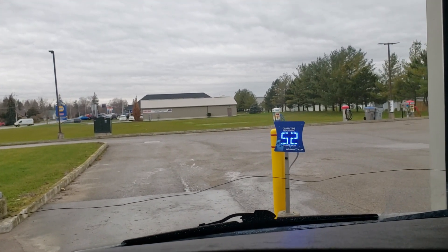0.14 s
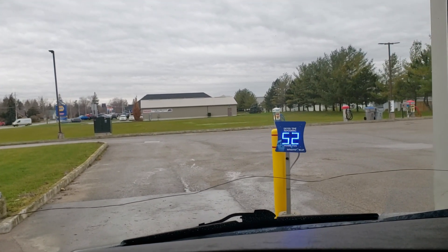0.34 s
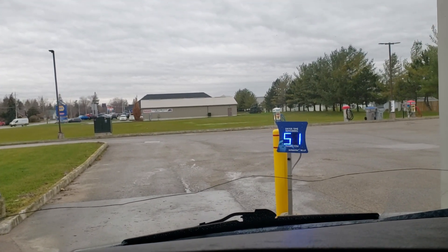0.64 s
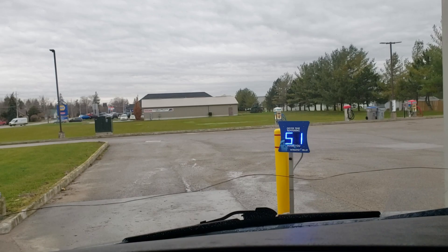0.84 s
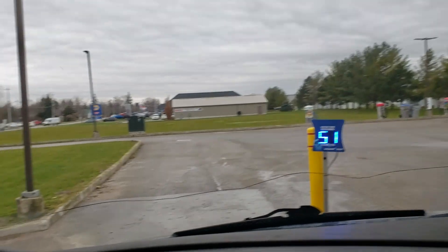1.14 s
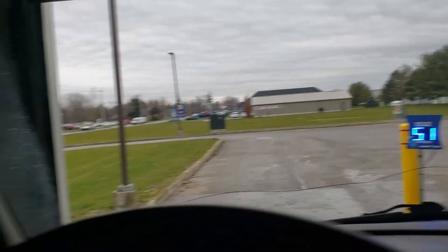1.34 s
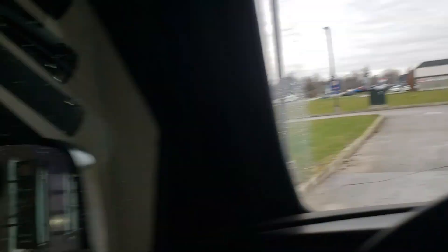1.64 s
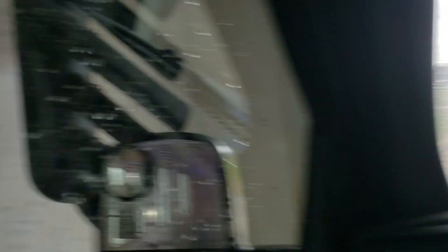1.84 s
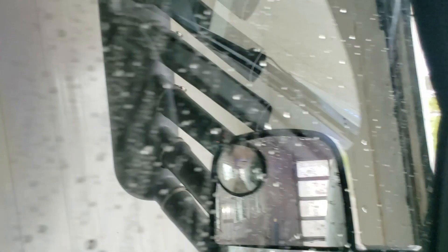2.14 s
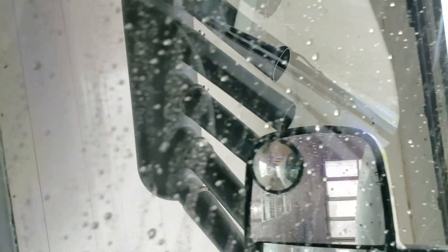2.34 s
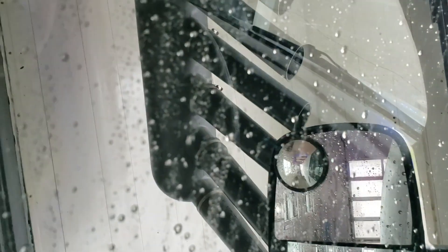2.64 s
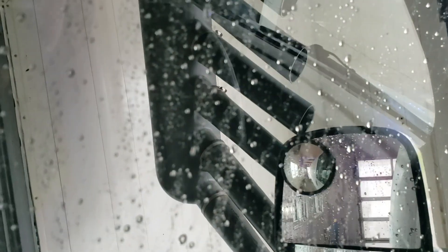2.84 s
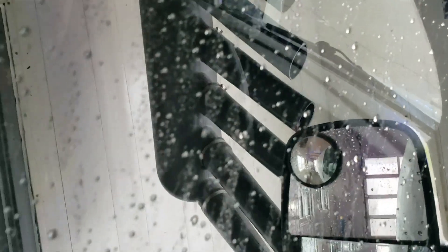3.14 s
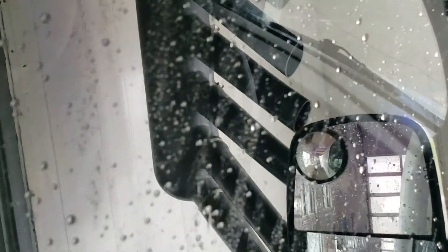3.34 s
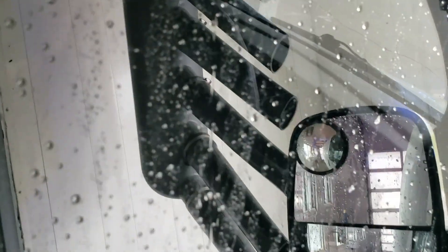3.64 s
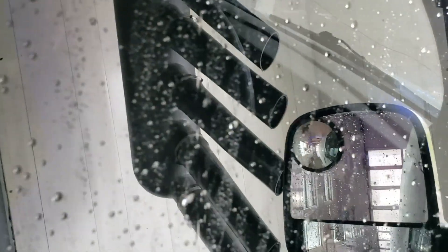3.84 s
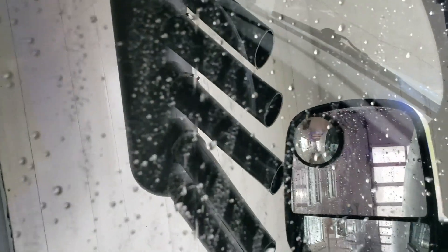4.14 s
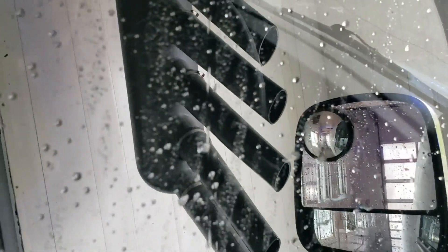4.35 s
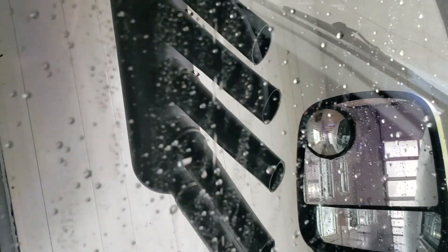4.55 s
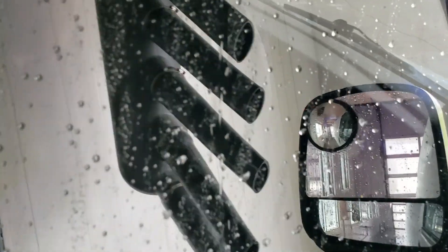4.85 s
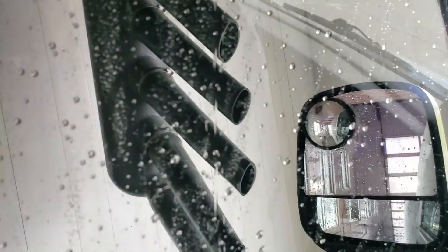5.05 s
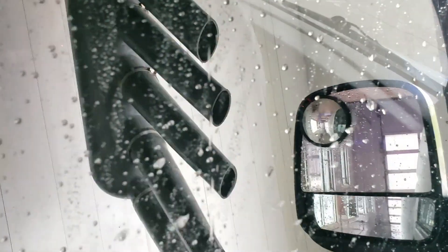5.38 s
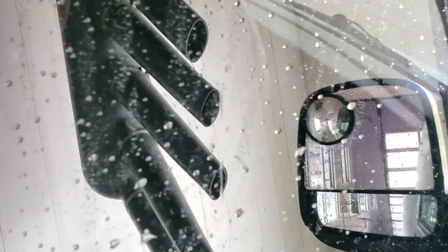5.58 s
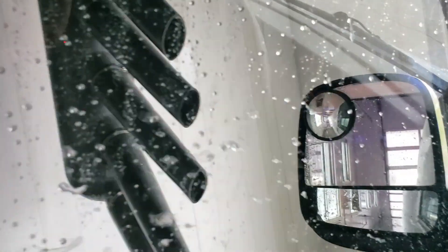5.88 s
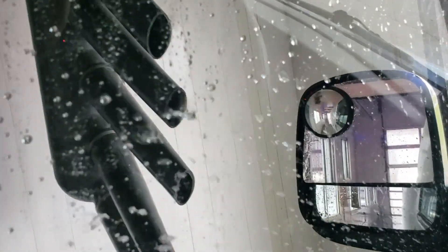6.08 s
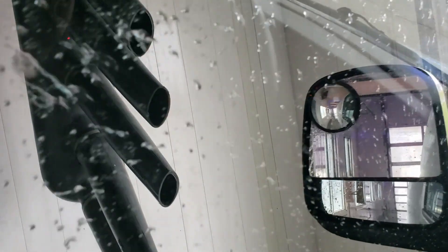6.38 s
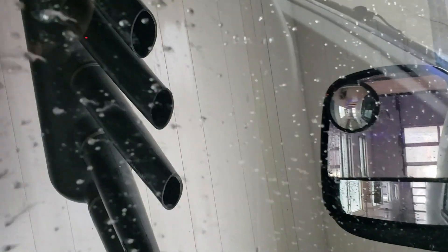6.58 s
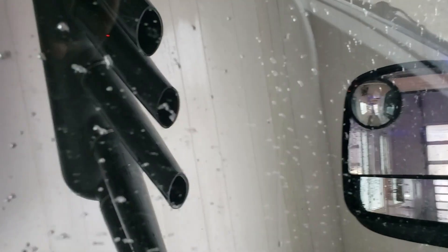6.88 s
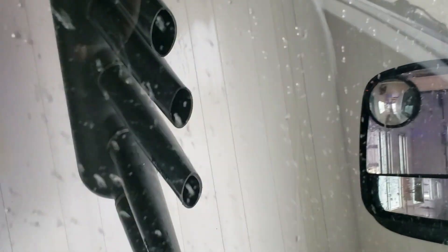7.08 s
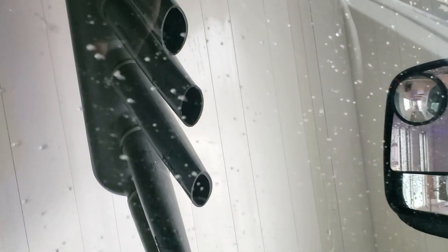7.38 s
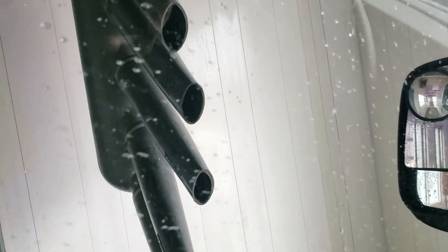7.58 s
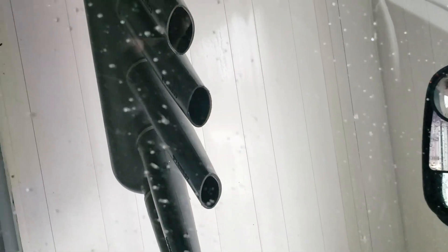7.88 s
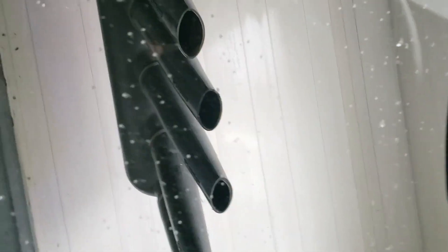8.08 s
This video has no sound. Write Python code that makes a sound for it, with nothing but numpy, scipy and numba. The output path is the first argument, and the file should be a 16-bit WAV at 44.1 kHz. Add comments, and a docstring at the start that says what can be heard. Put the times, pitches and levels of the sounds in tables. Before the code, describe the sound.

A loud, continuous dryer blast surrounds a slowly rolling vehicle, captured by a hand-held phone in the closed cab. Low drumming dominates, rising quickly in the first second, then shifting between panels as the jets pass. One faint tick comes early, followed by a wavering window hum. Muffled airy roar, thin hiss and a faint fan tone persist, while tiny wet spatters touch the glass later. The roar is still going at the end.

```python
"""A booming rush of air swells at once: car wash blowers dry a slowly rolling pickup, heard in the closed cab.
Jets drum the body panels (resonances shaken by noise) and the side window partly locks into a wavering hum.
Air over glass and seals is coloured noise; fans whine as faint sines; a tick is two filtered impulses.
Spray patters as flickering noise, splats as short ringing bursts.
A hand-held phone hears it at two ports; the second is duller, with partly its own treble."""
import sys
import numpy as np
from scipy import signal
from scipy.fft import rfft, irfft
from scipy.io import wavfile
from scipy.ndimage import uniform_filter1d
from numba import njit

SR = 44100
rng = np.random.default_rng(int(sys.argv[2]) if len(sys.argv) > 2 else 0)


def materialize(psi):
    """Save the field psi as 16-bit PCM at rate SR to the path in sys.argv[1].

    A 1-D psi becomes a single channel; in a 2-D psi each row is a channel.
    """
    bounded = np.clip(np.atleast_2d(psi).T, -1, 1)
    quanta = np.round(bounded * 32767).astype(np.int16)
    wavfile.write(sys.argv[1], SR, quanta)


N = 362502
T_S = np.arange(N) / SR
LOG_HZ = np.log(np.arange(N // 2 + 1) * SR / N + 1)  # 1 Hz offset keeps the zero bin finite

# Panel resonances: pitch_hz, width_hz, level_db
BUFFET_MODES = [(34, 21, -8), (50.6, 35, -1)]
ROOF_MODES = [(75.4, 21, 0)]
DOOR_MODES = [(115.8, 22, 0)]
WINDSCREEN_MODES = [(143.3, 26.3, 0)]
SIDE_WINDOW_MODES = [(167.3, 13.5, 0.5)]
PILLAR_MODES = [(194.1, 32.3, -0.5)]
FLOOR_MODES = [(231, 35.5, 0)]
TRIM_MODES = [(273.7, 27, 0), (299, 22, 0), (329.9, 30, -5.5)]
# Air noise spectra in the cab: pitch_hz, density_db (per Hz, before scaling to rms 1)
RUSH_COLOUR = [(310, -30), (345, -3), (400, -5.5), (440, -9), (480, -29.5)]
ROAR_COLOUR = [(410, -28.5), (450, -1.5), (520, -3), (590, -6), (650, -27)]
WASH_COLOUR = [(560, -29), (620, -1), (730, -1), (820, -8.5), (900, -34)]
DRAUGHT_COLOUR = [(740, -28), (820, -0.5), (920, -1.5), (1040, -1), (1180, -5.5), (1450, -25.5)]
WHOOSH_COLOUR = [(1020, -25), (1220, -1.5), (1570, -1), (1850, -4), (2150, -6), (2500, -22)]
HISS_COLOUR = [(1950, -25), (2250, -2), (2700, -0.5), (3300, -4), (3700, -5), (4400, -7), (5000, -11),
               (5600, -37.5)]
NOZZLE_COLOUR = [(2350, -24), (2650, 0.5), (3000, -2.5), (3300, 1.5), (3600, -26)]
FIZZ_COLOUR = [(4500, -30), (5100, -1.5), (6500, -3.5), (8300, -8), (9600, -28)]
SPRAY_COLOUR = [(7600, -25), (8800, -3), (10300, -1.5), (11900, 0), (13500, -3), (16000, -0.5)]
# Fan and motor tones, two blowers slightly apart in speed: pitch_hz, level_db (rms, against the gap whoosh)
FAN_TONES = [(526.2, -0.5), (1516.7, -16), (1522.8, -20.5), (1636.5, -18), (1643.5, -16)]
# Tick in the cab: start_s, click_db, rebound_delay_s, rebound_db
TICKS = [(.7017, -17, .0036, -21)]
# Blown water on the glass: start_s, level_db, t60_s, ring_hz
WATER_SPLATS = [(1.813, -63, .08, 12100), (5.38, -59, .15, 10500), (5.49, -61, .1, 12100),
                (5.556, -53, .12, 11800), (5.731, -51, .06, 11500), (5.81, -60, .12, 12100),
                (5.963, -56, .35, 12800), (6.06, -61, .15, 11400), (6.428, -53, .3, 11700),
                (6.504, -55, .25, 11900), (6.81, -59, .1, 10800), (7.04, -61, .1, 11000),
                (7.112, -57, .1, 12300), (7.225, -59, .25, 11500), (7.264, -55, .25, 12200),
                (7.547, -59, .15, 12100), (8.1, -60, .3, 12100)]
# Load per layer, keyed by name: rest_db, sweeps of (peak_s, half_length_s, lift_db)
DRUM_LOADS = { "buffet": (-34.5, [(.4, 0.7, 12), (5.2, .5, 3.5), (7.4, 0.45, 8.5)]),
              "roof": (-30, [(-0.37, 1.5, 7.5), (6.5, 2.2, 6), (8, 0.51, 5), (5, 0.27, 1)]),
              "door": (-26, [(1.2, 0.37, 9), (2.7, .2, 4), (3.35, 0.14, 4.5), (4.3, .2, 1.5),
              (5.6, 1.46, 7), (7.8, 0.45, 5)]), "windscreen": (-23.5, [(.9, 0.36, 5), (2.5, 0.54, 3.5),
              (4.5, 0.5, 7), (5.9, 0.38, 7), (7.3, 0.17, 2.5)]), "side window": (-32, [(1.7, 0.94, 15.5),
              (3.05, 0.13, 3.5), (4.6, 2.37, 8), (5.5, 0.3, 7.5)]), "pillar": (-26, [(2.1, 0.85, 7),
              (5.0, 0.96, 9)]), "floor": (-31.5, [(.8, 0.4, 11), (1.9, 0.33, 5), (4.6, 1.55, 5.5)]),
              "trim": (-31, [(.8, 0.31, 6), (5.6, .5, 3.5), (7.3, 2.1, 5.5)])}
AIR_LOADS = { "rush": (-35, [(.85, 0.34, 6.2), (1.7, 0.36, 1.6), (5.1, 0.47, 2.1), (6.5, 2.2, 3.1)]),
             "roar": (-37, [(.7, 0.9, 5.5), (3.3, 0.36, 1.8), (5.3, 0.84, 4.3)]),
             "wash": (-42.5, [(.8, 0.6, 5), (4.1, .7, 4.9), (5.4, 0.53, 2.2), (7.2, 1.2, 2.6)]),
             "draught": (-46.5, [(.4, 0.7, 6), (3.1, 0.39, 2), (4.8, .7, 4), (7.9, 0.46, 0.63)]),
             "gap whoosh": (-49.5, [(.2, 0.82, 7.7), (3.6, 0.35, 0.78), (4.7, .7, 3), (7.9, 0.96, 1.8)]),
             "seal hiss": (-52.5, [(.2, 0.95, 7.8), (3.3, 0.47, 1.7), (4.7, 0.62, 2), (7.8, .6, 0.9)]),
             "nozzle hiss": (-61.5, [(.3, 0.54, 4), (3.3, 0.6, 5.7), (4.8, .6, 5.1), (7.6, 0.72, 1.9)]),
             "fizz": (-61.5, [(.2, .9, 6.7), (5.1, .9, 2.5), (7.8, .9, 1.8)]),
             "spray": (-65, [(.5, 0.8, 6.5), (4.3, 0.56, 3), (5.4, .7, 3.5), (7.6, 0.94, 3.8)])}
# Second port against the first: pitch_hz, gain_db, common_share (0-1), lag_rad, forward_db (phone facing forward)
SECOND_PORT = [(30, 2, 1, 0.26, -0.5), (75, -3.5, 0.96, 0.24, 0.5), (114, -3, 0.97, 0.19, 0.6),
               (165, -5, 0.97, 0.24, 0), (210, -4.5, 0.86, 0.27, 3), (248, -7, 0.84, 0.26, 3),
               (320, -9, 0.8, 0.34, 3.5), (450, -7.5, .45, 0.4, 1), (554, -9.5, 0.4, 0.42, 2.5),
               (795, -9, .3, .45, 1.5), (1090, -9, 0, .8, 1), (2000, -9.5, 0, 0.96, 0),
               (4500, -13.5, .3, .88, 1), (6000, -19, .2, 0.98, 0), (7400, -26, .1, 0.93, -0.8),
               (8700, -18, 0, 1., -0.5), (9850, -3, .3, .89, 0), (12000, -5, .2, 0.96, 3),
               (15500, -10, .1, .91, 0.5)]

GUST_DB, GUST_PER_S = 1.2, 5.0
PANEL_WANDER, PANEL_WANDER_PER_S, PANEL_STEADY_S = 0.02, 3.0, 0.3  # wander is a fraction of pitch
HUM_PEAK_S, HUM_HALF_S = 1.85, 0.85
HUM_SHARE, HUM_SAG, HUM_WANDER = 0.5, 0.12, 0.03  # power share; sag and wander are fractions of pitch
HUM_ROUGH_DB, HUM_ROUGH_PER_S = 3.5, 18
IMPACT_DB, IMPACT_S = 3, 0.003
TURN_S, TURN_SPAN_S = 1.9, 0.3  # the phone swings from the windscreen to the side window
LIMIT_TOP, LIMIT_RATIO, ATTACK_S, RELEASE_S = 0.35, 1.46, 0.0034, 0.045
LOW_CUT_HZ, BASS_HZ, TOP_HZ = 44, 400, 15780
TREBLE_SHARE = 0.32  # exponent on the gain above BASS_HZ


def undb(db):
    """dB to gain."""
    return 10 ** (np.asarray(db) / 20)


def unit(x):
    """Scale to rms 1."""
    return x / np.sqrt(np.mean(x ** 2))


def over_hz(table, edge=None):
    """Table columns interpolated over log frequency, one value a bin."""
    hz, *columns = np.transpose(table)
    return [np.interp(LOG_HZ, np.log(hz), column, edge, edge) for column in columns]


def smooth_twice(x, length):
    """Two moving averages in a row."""
    return uniform_filter1d(uniform_filter1d(x, length), length)


def walk(rate_per_s):
    """Random levels held 1 / rate_per_s and slewed twice; spread near 1."""
    hold = int(SR / rate_per_s)
    steps = np.repeat(rng.standard_normal(N // hold + 1), hold)
    return 1.3 * smooth_twice(steps, hold)[:N]


def swells(layers):
    """Level in dB of each layer over time: rest level plus a bell-shaped swell per sweep."""
    levels_db = {}
    for name, (rest_db, sweeps) in layers.items():
        lifts_db = [lift_db * np.exp(-0.5 * ((T_S - peak_s) / half_s) ** 2) for peak_s, half_s, lift_db in sweeps]
        levels_db[name] = rest_db + sum(lifts_db)
    return levels_db


def turbulence(gain):
    """Two unrelated noises of one colour, jointly rms 1: the fields at the two ports."""
    return unit(irfft(rfft(rng.standard_normal((2, N))) * gain, N))


def panel(modes):
    """Turbulence shakes steep-flanked resonances; pitch drifts and slow level is held steady for the load to set."""
    hz = np.exp(LOG_HZ)
    power = 0
    for pitch_hz, width_hz, level_db in modes:
        detune = (hz - pitch_hz * pitch_hz / hz) / width_hz
        power = power + undb(2 * level_db) / (1 + detune ** 2) ** 2
    # uneven reading speed slides the pitch
    place = np.cumsum(1 + PANEL_WANDER * walk(PANEL_WANDER_PER_S))
    fields = turbulence(np.sqrt(power))
    motion = np.array([np.interp(place, np.arange(N), field, period=N) for field in fields])
    return motion / np.sqrt(smooth_twice(motion ** 2, int(PANEL_STEADY_S * SR)))


def side_window():
    """Panel motion partly locks into a rough, wavering hum, flatter as the top jet comes and goes."""
    lock = np.exp(-0.5 * ((T_S - HUM_PEAK_S) / HUM_HALF_S) ** 2)
    bend = 1 - HUM_SAG * (1 - lock) + HUM_WANDER * walk(HUM_ROUGH_PER_S)
    pitch_hz = SIDE_WINDOW_MODES[0][0] * bend
    phase_rad = 2 * np.pi * (np.cumsum(pitch_hz) / SR + rng.random((2, 1)))
    # turbulence breaks the hum up
    hum = unit(undb(HUM_ROUGH_DB * walk(HUM_ROUGH_PER_S)) * np.sin(phase_rad))
    share = np.clip(HUM_SHARE * lock, 0, 1)
    return np.sqrt(share) * hum + np.sqrt(1 - share) * panel(SIDE_WINDOW_MODES)


def body():
    """Jets drum each part of the cab by its own load, with independent random gusts."""
    parts = {
        "buffet": panel(BUFFET_MODES), "roof": panel(ROOF_MODES), "door": panel(DOOR_MODES),
        "windscreen": panel(WINDSCREEN_MODES), "side window": side_window(), "pillar": panel(PILLAR_MODES),
        "floor": panel(FLOOR_MODES), "trim": panel(TRIM_MODES)}
    loads_db = swells(DRUM_LOADS)
    return sum(undb(loads_db[name] + GUST_DB * walk(GUST_PER_S)) * part for name, part in parts.items())


def coloured(colour, drift_db=0.4, flutter_db=0.87, count=4):
    """Coloured turbulence whose overlapping frequency slices drift and flutter on their own."""
    noise = rfft(turbulence(undb(over_hz(colour, edge=-200)[0])))
    place = np.interp(LOG_HZ, np.log([colour[0][0], colour[-1][0]]), [0, count - 1])
    total = 0
    for k in range(count):
        band = irfft(noise * np.clip(1 - abs(place - k), 0, 1), N)
        total = total + undb(drift_db * walk(1.6) + flutter_db * walk(9)) * band
    return unit(total)


def fan_whine():
    """Fan and motor sines waver in speed and level, each at its own phase per port."""
    whine = np.zeros((2, N))
    for pitch_hz, level_db in FAN_TONES:
        speed = 1 + 0.0006 * walk(3)
        phase_rad = 2 * np.pi * (pitch_hz * np.cumsum(speed) / SR + rng.random((2, 1)))
        whine += np.sqrt(2) * undb(level_db + 1.6 * walk(2.54)) * np.sin(phase_rad)
    return whine


def air():
    """Nine fluttering air noises swell with their loads; fan tones leak in with the gap whoosh."""
    db = swells(AIR_LOADS)
    whoosh = undb(0.24 * walk(5.9)) * coloured(WHOOSH_COLOUR) + fan_whine()
    patter_db = 0.25 * walk(16) + 0.7 * walk(40)  # drops come in small flurries
    fizz_db = db["fizz"] + 0.4 * patter_db + 0.4 * walk(10)
    mix = undb(db["rush"] + 0.17 * walk(23)) * coloured(RUSH_COLOUR, count=2)
    mix += undb(db["roar"]) * coloured(ROAR_COLOUR, count=2)
    mix += undb(db["wash"]) * coloured(WASH_COLOUR, count=2)
    mix += undb(db["draught"]) * coloured(DRAUGHT_COLOUR, count=2)
    mix += undb(db["gap whoosh"]) * whoosh
    mix += undb(db["seal hiss"] + 0.55 * walk(9)) * coloured(HISS_COLOUR)
    mix += undb(db["nozzle hiss"]) * coloured(NOZZLE_COLOUR, count=2)
    mix += undb(fizz_db) * coloured(FIZZ_COLOUR, drift_db=0.5)
    mix += undb(db["spray"] + patter_db) * coloured(SPRAY_COLOUR, drift_db=0.5)
    return mix


def tick():
    """A hard impulse and one rebound that rings briefly, high-passed and equal in both fields."""
    click, rebound = np.zeros((2, N))
    for start_s, click_db, delay_s, rebound_db in TICKS:
        click[int(start_s * SR)] = undb(click_db)
        rebound[int((start_s + delay_s) * SR)] = undb(rebound_db)
    out = click + signal.lfilter(*signal.iirpeak(12800, 12, SR), rebound)
    out = signal.sosfilt(signal.butter(4, 11500, "high", fs=SR, output="sos"), out)
    return np.array([out, out])


def splats():
    """Water striking glass: decaying bright hiss with a slight ring, broken into droplets."""
    out, span_s = np.zeros((2, N)), T_S[:SR // 16]
    length = len(span_s)
    high_pass = signal.butter(2, 7000, "high", fs=SR, output="sos")
    runoff = np.clip((span_s[-1] - span_s) / 0.03, 0, 1)  # the water runs off
    for start_s, level_db, t60_s, ring_hz in WATER_SPLATS:
        noise = rng.standard_normal((2, length))
        hiss = signal.sosfilt(high_pass, noise)
        ring = signal.lfilter(*signal.iirpeak(ring_hz, 9.0, SR), noise)
        droplets = undb(2.2 * np.repeat(rng.standard_normal(length // 128 + 1), 128)[:length])
        impact_db = IMPACT_DB * np.exp(-span_s / IMPACT_S)  # first contact stands out
        decay_db = -60 * span_s / max(t60_s, 0.01)
        envelope = droplets * runoff * undb(level_db + impact_db + decay_db)
        start = int(start_s * SR)
        out[:, start:start + length] += (0.73 * hiss + 1.6 * ring) * envelope
    return out


def scene():
    """Body boom, air, the tick and water splats."""
    return body() + air() + tick() + splats()


@njit
def follow(x, attack, release):
    """Envelope that rises fast and falls slowly."""
    level, out = x[0], np.empty(len(x))
    for i in range(len(x)):
        level += (x[i] - level) * (attack if x[i] > level else release)
        out[i] = level
    return out


def second_port(dry):
    """Partly shared, lagged and filtered field; its tone shifts as the phone turns."""
    gain_db, share, lag_rad, forward_db = over_hz(SECOND_PORT)
    share = np.clip(share, 0, 1)
    first, other = rfft(dry)
    second = undb(gain_db) * (share * np.exp(-1j * lag_rad) * first + np.sqrt(1 - share ** 2) * other)
    forward = 0.5 - 0.5 * np.tanh((T_S - TURN_S) / TURN_SPAN_S)
    return forward * irfft(undb(forward_db) * second, N) + (1 - forward) * irfft(second, N)


def gain_control(pair):
    """Shared peak-following gain reduction that holds the bass hardest."""
    envelope = follow(np.abs(pair).max(axis=0), 1 / (ATTACK_S * SR), 1 / (RELEASE_S * SR))
    gain = np.minimum(1, LIMIT_TOP / (envelope + 1e-9)) ** (1 - 1 / max(LIMIT_RATIO, 1))
    bass = signal.sosfiltfilt(signal.butter(2, BASS_HZ, fs=SR, output="sos"), pair)
    return gain * bass + gain ** TREBLE_SHARE * (pair - bass)


def record(dry):
    """Two phone ports, low cut, gain control, steep top cut."""
    low_cut = signal.butter(2, LOW_CUT_HZ, "high", fs=SR, output="sos")
    pair = signal.sosfilt(low_cut, [dry[0], second_port(dry)])
    top_cut = signal.ellip(12, 0.2, 80, TOP_HZ, fs=SR, output="sos")
    return signal.sosfilt(top_cut, gain_control(pair))


dry = scene()
out = record(dry)
materialize(out)
```